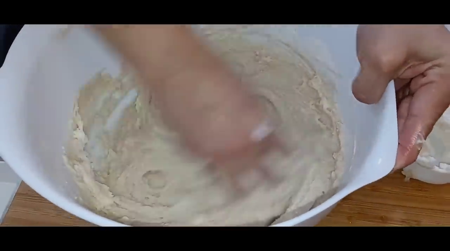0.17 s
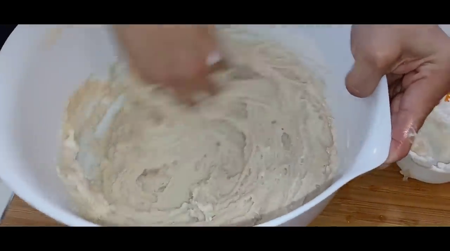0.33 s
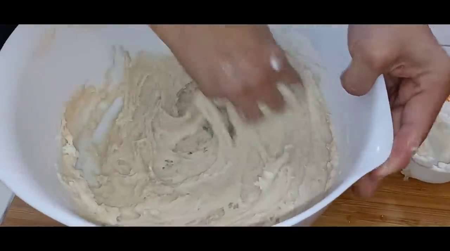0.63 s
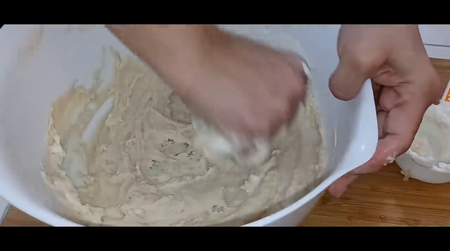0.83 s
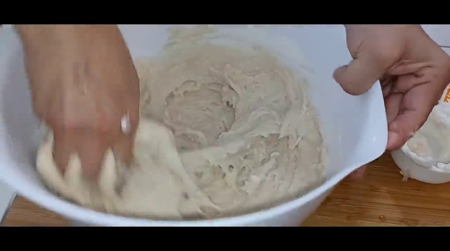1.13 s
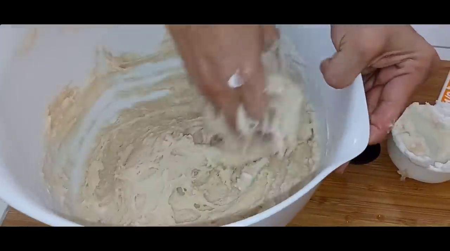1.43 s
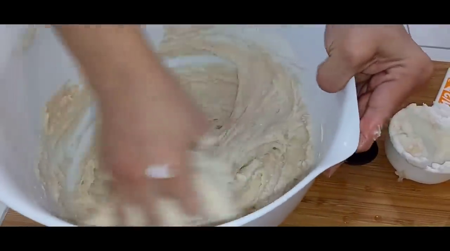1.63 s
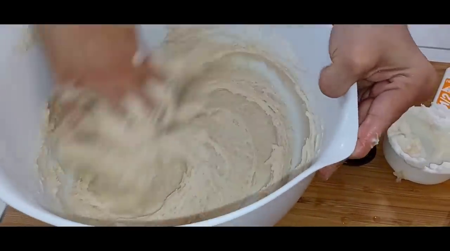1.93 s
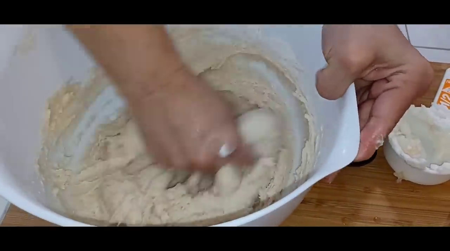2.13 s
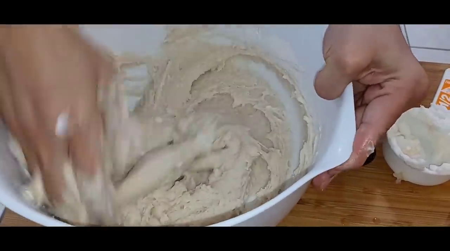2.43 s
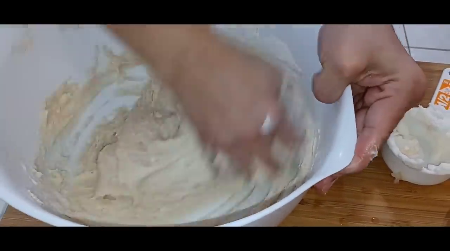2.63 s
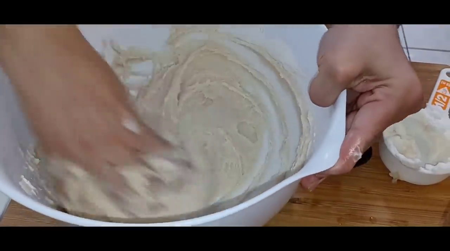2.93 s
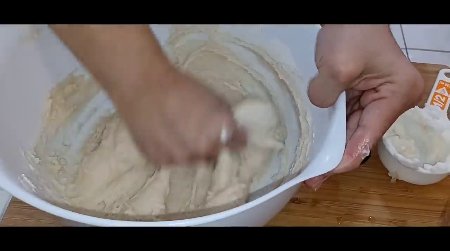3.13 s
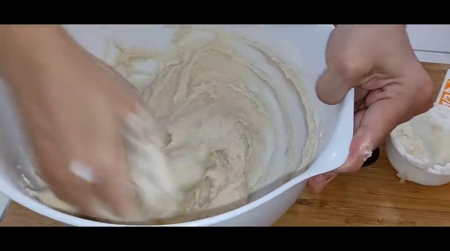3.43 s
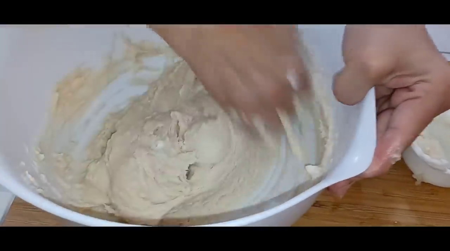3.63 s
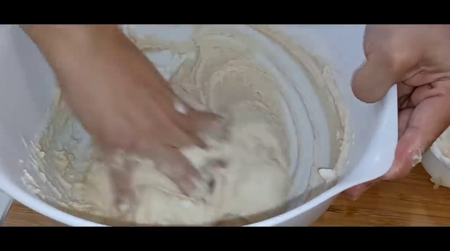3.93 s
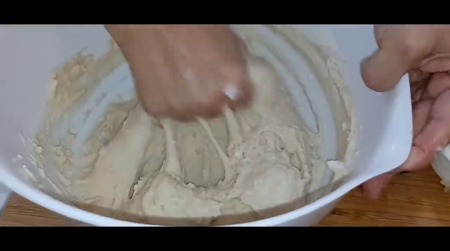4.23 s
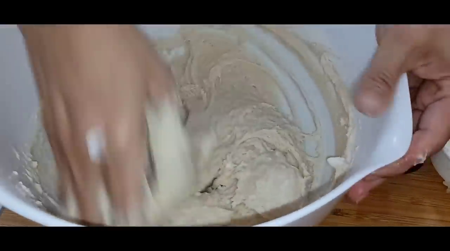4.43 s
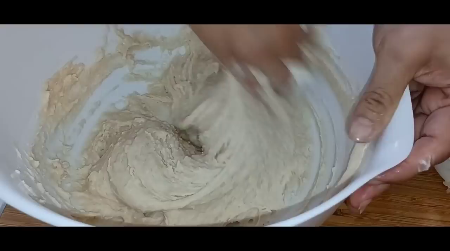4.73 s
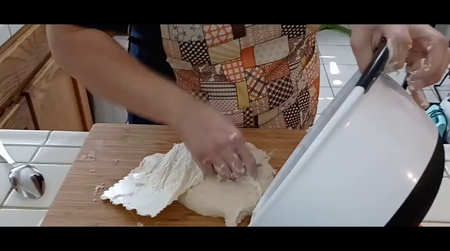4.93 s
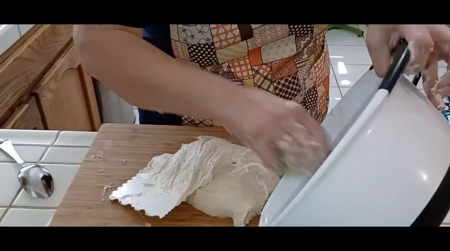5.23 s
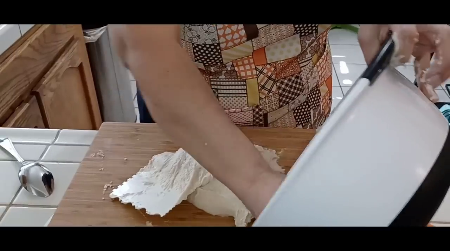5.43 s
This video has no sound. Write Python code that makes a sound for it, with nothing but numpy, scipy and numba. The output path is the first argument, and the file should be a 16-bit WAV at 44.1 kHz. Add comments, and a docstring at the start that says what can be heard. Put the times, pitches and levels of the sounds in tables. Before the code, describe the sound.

A hand kneads wet, sticky dough in a plastic bowl, with squelches, crackling peels, popping air pockets and a few hard bowl thumps.

```python
"""Kneading wet dough

A hand kneads wet, sticky dough in a large plastic bowl on a wooden board, heard close up in a kitchen.
Stick-slip friction peels dough off the plastic in a crackle of tiny slips, which rub, squelch, tear and fizz.
Trapped air squirts through closing gaps, and air pockets burst with a snap and a short, rising note.
A few times the bowl rocks and its impacts on the board excite thuds, wall modes and slaps of dough.
Each blow rings briefly in counter and room, over a low hum of filtered noise."""
import sys
import numpy as np
from scipy import signal
from scipy.fft import rfft, irfft
from scipy.io import wavfile
from numba import njit

SR = 44100
rng = np.random.default_rng(int(sys.argv[2]) if len(sys.argv) > 2 else 0)


def master(y):
    """Save y as 16-bit WAV."""
    cut = np.clip(np.atleast_2d(y).T, -1, 1)
    pcm = np.round(cut * 32767)  # scale
    wavfile.write(sys.argv[1], SR, pcm.astype(np.int16))


N = 245448
TIME = np.arange(N) / SR
# the strengths of kneading are zero between these times in seconds; its stirring does not return,
# and the reverberation of the dough is silent from the first time on
HUSH_S, RESUME_S = 5.351, 5.478


def kneading():
    """Stick-slip: slips rub the wall, squelch in the folds, snap strands and fizz in the wet film."""
    rub, squelch, tear, fizz = effort()
    # now and then a thicker strand lets go all at once
    strands = slips(per_s=200, spread_db=-1.0, clump_db=1.5, wide_hz=900)
    coarse = slips(per_s=6000, spread_db=3.5, clump_db=2.0, wide_hz=860) + undb(-8.0) * strands
    fine = slips(per_s=10000, spread_db=5.5, clump_db=1.26, wide_hz=1200) + undb(-9.0) * strands
    rubbing = undb(0.5) * rub * rubbed_wall(coarse)
    squelching = undb(-2.5) * squelch * folds(coarse, shift_db=3.5)
    tearing = undb(-2.5) * tear * torn_strands(fine, flicker_db=3.5)
    fizzing = undb(-3.5) * fizz * wet_film(fine, flicker_db=2.5)
    return rubbing + squelching + tearing + fizzing + squelch * bubbles(cycles=15.0)


# The hand drags the dough round and peels it off the wall.
# Each row: start, hardest moment and end in seconds, squelch in dB before mixing, rubbing and tearing
# in dB relative to the squelch, extra fizz in dB.
PULLS = [(-0.03, 0.001, 0.014, -45.5, -1.5, -10, 2.5), (0.367, 0.462, 0.46, -51, -5, -11, 0.5),
         (1.205, 1.288, 1.4, -46.5, -22, -7.5, 4), (1.724, 1.821, 1.84, -40.5, -5, -11.5, -2),
         (2.565, 2.653, 2.78, -44, -9, -12, 1), (3.532, 3.628, 3.73, -42.5, -8.5, -9.5, -0.5),
         (4.608, 4.818, 4.87, -48.5, -6, -8.5, -2), (4.995, 5.034, 5.24, -55, 4.5, -11.5, -8)]
# The fingers close in the dough.
# Each row: start in seconds, squelch in dB before mixing, rubbing and tearing in dB relative to the squelch,
# extra fizz in dB.
SQUEEZES = [(0.026, -54.5, 4, -9, 1), (0.485, -59, -24, -9, -14), (0.643, -56, 2, -14, -20),
            (0.7, -66, -4, -10, 3), (0.766, -58, -3, -13, 0), (0.847, -60, 2, -10, -9),
            (0.929, -54, 2, -19, -16), (1.02, -70.5, 18, 7, 0), (1.097, -59, 0, -5.5, 2),
            (1.187, -48.5, -7, -23, -14), (1.644, -54, -2, -5.5, 0), (2.075, -61.5, 2, -13, -12),
            (2.31, -65, 5, -5, 10), (2.386, -70, -15, 6, 16), (2.806, -51, -7, -2, 2.5),
            (3.009, -58, 2, -4.5, 4), (3.069, -67, 10, -13, -10), (3.122, -66.5, 2, 2, 1),
            (3.259, -79, 20.5, 10, 23), (3.358, -69, 4, 6.5, 15.5), (3.483, -61.5, 0, -11, -17),
            (3.534, -54.5, -29, -18, -5), (3.996, -59, 5.5, -1, -1), (4.032, -49.5, -2, -27, -14),
            (4.125, -57.5, 2.5, -10, -7), (4.249, -59.5, -29, -37, 4), (4.365, -70, -6, 7, 8),
            (4.425, -61.5, 1.5, -9, 1.5), (4.641, -50.5, 1, -6, 1), (4.915, -62.5, 2, -22, -3),
            (5.179, -65, 7, -3, 2), (5.299, -54.5, -1.5, -22, -4), (5.478, -67.5, 8, -17, -25)]
# The hand slows or turns and the stirring mostly dies down.
# Each row: centre in seconds, half length in seconds (to 1/e), change of level in dB.
LULLS = [(0.17, 0.028, -1.5), (0.528, 0.046, -24), (0.794, 0.041, -13), (0.94, 0.05, -8.5),
         (1.516, 0.06, -3.5), (2.52, 0.09, -8.5), (2.974, 0.023, -5), (3.294, 0.047, -16),
         (3.45, 0.06, -15), (3.952, 0.036, -12), (4.234, 0.075, -6.5), (4.487, 0.041, -22),
         (4.977, 0.16, -7), (5.256, 0.04, -18), (2.18, 0.088, 1)]
# a pull swells from SWELL dB below its hardest moment and eases off to EASE dB below it
PULL_ATTACK_S, PULL_SWELL_DB, PULL_EASE_DB, PULL_T60_S = 0.04, 13, 5.5, 0.43
# a squeeze is one short push
SQUEEZE_ATTACK_S, SQUEEZE_HOLD_S, SQUEEZE_T60_S = 0.0048, 0.022, 0.31
# before mixing, the film fizzes at FIZZ_DB when the squelch is at FIRM_DB, and grows more slowly than it
FIZZ_DB, FIRM_DB, FIZZ_GROWTH = -48, -44, 0.86
# quiet stirring between strokes, in dB before mixing: rubbing, squelch, tearing, fizz
STIR_DB = (-65, -69.5, -67.5, -57.5)
STIR_WAVER_DB = 2


def effort():
    """Power addition: the strengths of pulls, squeezes and quiet stirring combine as sums of squares."""
    strokes = []
    for start, hardest, end, db, *shares in PULLS:
        below_db = np.interp(TIME, [start, hardest, end], [PULL_SWELL_DB, 0, PULL_EASE_DB])
        pull = undb(db - below_db) * envelope(start, end, PULL_ATTACK_S, PULL_T60_S)
        strokes.append((pull, *shares))
    for s, db, *shares in SQUEEZES:
        squeeze = undb(db) * envelope(s, s + SQUEEZE_HOLD_S, SQUEEZE_ATTACK_S, SQUEEZE_T60_S)
        strokes.append((squeeze, *shares))
    lulls = sum(db * np.exp(-((TIME - s) / half_s) ** 2) for s, half_s, db in LULLS)
    stirring = np.array([undb(db + lulls + STIR_WAVER_DB * walk(per_s=25)) for db in STIR_DB])
    power = stirring ** 2 * (TIME < HUSH_S)
    for push, rub_db, tear_db, fizz_db in strokes:
        fizz = undb(FIZZ_DB + fizz_db) * (push / undb(FIRM_DB)) ** FIZZ_GROWTH
        power += np.array([undb(rub_db) * push, push, undb(tear_db) * push, fizz]) ** 2
    return np.sqrt(power) * ((TIME < HUSH_S) | (TIME > RESUME_S))


def slips(per_s, spread_db, clump_db, wide_hz):
    """Stick-slip releases as random impulses: uneven in size, in clumps, each from its own place in the bowl."""
    happens = rng.random(N) < per_s / SR
    uneven_db = spread_db * np.minimum(rng.exponential(size=N), np.pi)
    size = undb(uneven_db + clump_db * walk(per_s=130))
    mid, side = happens * size * rng.standard_normal((2, N))
    return unit(widen(mid, side, wide_hz))


# Colour of dough rubbing the wall. Each row: frequency in Hz, relative level in dB.
RUB = [(120, 6.5), (300, 2), (470, 0.5), (570, 1.5), (750, -9), (1000, -12), (1600, -78)]


def rubbed_wall(coarse):
    """Spectral filtering: coarse slips take on the low colour of rubbing."""
    return unit(colour(coarse, RUB))


# Folds of dough that ring as it peels.
# Each row: central note in Hz, width in Hz (doubled in each of two resonators in series), relative level in dB.
FOLDS = [(1050, 176, 9), (1420, 630, 1), (1797, 770, 5), (2097, 140, 3), (2816, 295, -1), (3250, 660, -14)]
# the folds change size as they are worked, and the slips come in gulps
FOLD_DRIFT_OCT, GULP_DB = 0.11, 1.5


def folds(x, shift_db):
    """Cavity resonance: each fold rings more or less, higher or lower, as the fingers open and close it."""
    out = 0
    for hz, width, db in FOLDS:
        note = hz * 2 ** (FOLD_DRIFT_OCT * walk(per_s=14))
        level = undb(db + shift_db * walk(per_s=16))
        gulps = x * undb(GULP_DB * walk(per_s=100))
        out = out + level * cavity(gulps, note, 2 * width / hz)
    return unit(out)


# Colour of tearing strands. Each row: frequency in Hz, relative level in dB.
TEAR = [(2000, 2), (3300, -1), (4000, -6.5), (4900, 9), (6500, 8), (8000, -13.5), (11000, -44.5)]


def torn_strands(fine, flicker_db):
    """Spectral filtering: fine slips take on the colour of tearing, whose level flickers on its own."""
    return undb(flicker_db * walk(per_s=45)) * unit(colour(fine, TEAR))


# Colour of the fizzing film and of bursting skins. Each row: frequency in Hz, relative level in dB.
FIZZ = [(5000, -15.5), (8200, -10), (10500, -0.5), (13300, 4), (14500, 2), (16000, -5)]


def wet_film(fine, flicker_db):
    """Spectral filtering: fine slips take on the treble of the wet film, whose level flickers on its own."""
    return undb(flicker_db * walk(per_s=52)) * unit(colour(fine, FIZZ))


# tiny air bubbles: rate, pitch range, level relative to the squelch (7.5 dB below to 2.5 dB above BUBBLE_DB)
BUBBLES_PER_S, BUBBLE_LOW_HZ, BUBBLE_HIGH_HZ, BUBBLE_DB, BUBBLE_SPREAD_DB = 100, 893, 4200, 7, 5


def bubbles(cycles):
    """Bubble resonance: bursts at random times ring for a few cycles, each with its own pitch, size and place."""
    out, t = np.zeros((2, N)), TIME[:SR // 40]
    s = 0
    for wait, pitch, size, place in rng.random((N // 300, 4)):
        s -= np.log(1 - wait) / BUBBLES_PER_S  # exponential waiting time
        if s < TIME[-1]:
            hz = BUBBLE_LOW_HZ * (BUBBLE_HIGH_HZ / BUBBLE_LOW_HZ) ** pitch
            gain = undb(BUBBLE_DB + BUBBLE_SPREAD_DB * (2 * size - 1.5))
            note = gain * np.sin(2 * np.pi * hz * t) * fade(t, cycles / hz)
            add(out, s, np.outer(np.sqrt([place, 1 - place]), note))
    return out


# Air and wet dough squirting through a narrow gap.
# Each row: start in seconds, length in seconds, central gap note in Hz, level in dB before mixing,
# left minus right in dB.
SQUIRTS = [(0.148, 0.07, 1510, -64.5, -3), (0.346, 0.11, 1630, -59.5, 8), (0.424, 0.026, 6440, -56, 3),
           (0.425, 0.021, 2870, -68, -3), (0.538, 0.021, 3740, -65, 0), (1.055, 0.016, 6200, -55, 1),
           (1.257, 0.025, 4650, -52, -4), (1.293, 0.027, 2770, -49, -3), (1.303, 0.032, 4360, -51, -4),
           (1.403, 0.024, 3790, -56, -1), (1.486, 0.22, 2880, -72, -6), (1.896, 0.05, 1480, -54, -3),
           (2.31, 0.089, 1650, -64, 6), (2.392, 0.053, 3200, -59.5, -2), (2.558, 0.077, 1570, -58, 7),
           (2.581, 0.073, 2900, -52, -3), (2.681, 0.064, 4530, -48, -3), (2.787, 0.04, 4730, -58, 8),
           (3.117, 0.052, 4300, -58.5, -4), (3.263, 0.029, 7000, -54.5, 5), (3.37, 0.045, 2880, -61, 1),
           (3.555, 0.063, 1980, -48, 7), (3.613, 0.047, 2750, -51, 13), (3.636, 0.066, 4800, -52, 1),
           (3.688, 0.027, 4900, -56, 2), (3.75, 0.047, 5240, -58, 9), (4.016, 0.03, 2700, -53, 9),
           (4.053, 0.034, 2180, -56, 8), (4.148, 0.021, 3080, -54.5, 6), (4.238, 0.071, 1470, -59, 2),
           (4.528, 0.12, 1780, -60, -3), (4.639, 0.014, 6300, -48.5, 2), (5.313, 0.03, 2360, -68, 8),
           (5.466, 0.092, 1764, -65.5, -2)]
# resonator width and total rise as shares of the note; the gap is widest at this share of the length
SQUIRT_WIDTH, SQUIRT_RISE, SQUIRT_OPEN = 0.32, 0.08, 0.27


def squirts():
    """Gap resonance: a sputter of slips rings a gap that opens quickly, and its note rises as it closes."""
    out = np.zeros((2, N))
    sputter = slips(per_s=3500, spread_db=2.5, clump_db=3.5, wide_hz=2500)
    for s, length_s, hz, db, pan_db in SQUIRTS:
        u = np.arange(int(length_s * SR)) / (length_s * SR)
        source = sputter.take(int(s * SR) + np.arange(len(u)), axis=1, mode="wrap")
        opening = np.interp(u, [0, SQUIRT_OPEN, 1], [0, 1, 0])
        note = hz * (1 + SQUIRT_RISE * (u - .5))
        sound = unit(opening * cavity(source, note, SQUIRT_WIDTH))
        add(out, s, undb(db) * panned(pan_db) * sound)
    return out


# Air pockets bursting.
# Each row: time in seconds, snap in dB before filtering and mixing, cavity note in Hz at the start,
# cavity level in dB before mixing, left minus right in dB.
POPS = [(0.0389, -49, 1000, -37.5, -9), (0.038, -38, 5900, -26, 5.5), (0.039, -50, 2680, -36, 0),
        (0.4518, -21.5, 5980, -22, 2.5), (0.455, -48, 1890, -38, 7), (0.5802, -37, 6580, -38.5, 1),
        (0.643, -40, 6200, -49, 5), (0.6494, -32, 2320, -31, 3), (0.7378, -37, 6100, -45, 0),
        (0.837, -35, 6000, -65, 6), (0.8525, -23, 6030, -23, -1.5), (0.853, -38, 700, -38, 5),
        (1.059, -35, 1050, -40, -2), (1.103, -53, 2800, -38, -5.5), (1.1937, -36, 3040, -30, -3),
        (1.1968, -32.5, 4500, -31, -6), (1.243, -41, 2670, -25.5, -3), (1.2626, -43, 4760, -38, 2),
        (1.3654, -33, 5260, -35, 2), (1.2782, -31.5, 3200, -23, 0), (1.7739, -53, 1750, -30, 12),
        (1.8184, -46, 4630, -14.5, -6.5), (1.82, -58, 1800, -31, 12), (2.2397, -36, 14000, -22, 1),
        (2.299, -41, 11000, -41, 5), (2.41, -42, 2900, -55, 0), (2.3589, -42, 6000, -45, 2),
        (2.392, -35, 5970, -60, -5), (2.4399, -38, 6000, -49, 2), (2.6214, -34, 2110, -30, 7),
        (2.652, -28.5, 2760, -20, 2), (2.661, -32, 2390, -29, -5), (2.678, -29, 2500, -24, 2.5),
        (2.6858, -43, 2500, -26, 12), (2.75, -51, 1900, -36, 7), (2.8948, -37, 5500, -45, 2),
        (3.174, -70, 1370, -48, 2), (3.262, -35.5, 7300, -56, 1), (3.277, -37, 6240, -54, 13),
        (3.484, -44, 1410, -42.5, -3), (3.602, -43, 2000, -32, 3), (3.6232, -37, 1930, -24.5, -3),
        (3.627, -24.5, 1050, -23, 5), (3.634, -40, 1700, -31, 4), (4.086, -46, 6450, -28.5, 2),
        (4.1512, -37.5, 3200, -48, -2), (4.156, -52, 1080, -52, -5), (4.359, -26.5, 12000, -58, 3),
        (4.5432, -39.5, 2500, -43, -3), (4.645, -31, 4640, -38, 1), (4.7684, -28, 2800, -32, 6),
        (4.7922, -22.5, 3230, -33, 6.5), (4.804, -28, 5000, -30, 4), (4.954, -39, 5940, -61, 5),
        (5.1, -48, 1090, -41.5, 15.5), (5.1820, -28, 2430, -36.5, 2), (5.1944, -28, 6000, -35, -7)]


def pops(cycles, snap_t60, spray_db, skin_db, open_s, rise):
    """Cavity burst: a film snaps with a little spray; the pocket behind rings for a few cycles, rising."""
    snaps, pockets, t = np.zeros((2, N)), np.zeros((2, N)), TIME[:SR // 20]
    for s, snap_db, hz, pocket_db, pan_db in POPS:
        place = panned(pan_db)
        spray, skin = rng.standard_normal((2, 2, len(t)))
        snap = (t == 0) + undb(spray_db) * spray * fade(t, snap_t60)
        add(snaps, s, place * undb(snap_db) * snap)
        # the slack skin of the pocket smears its note
        skin = unit(signal.lfilter(*signal.iirpeak(hz, 1.5, fs=SR), skin))
        rising = 1 + rise * np.minimum(t * hz / cycles, 1)
        note = np.sin(2 * np.pi * hz * t * rising) + undb(skin_db) * skin
        note = note * (1 - np.exp(-t / open_s)) * fade(t, cycles / hz)
        add(pockets, s, place * undb(pocket_db) * note)
    return undb(6.0) * colour(snaps, FIZZ) + undb(-2.0) * pockets


def scatter(x, t60, gap_s, per_s, count):
    """Multipath reflection: paths inside the bowl keep changing as the hand moves, at constant total power."""
    shares = np.array([walk(per_s=per_s) for _ in range(count)])
    shares /= np.sqrt(np.sum(shares ** 2, axis=0))
    return sum(reflections(share * x, t60=t60, gap_s=gap_s, wide_hz=700) for share in shares)


# Dough slapping the wall as the bowl lands. Each row: frequency in Hz, relative level in dB.
SLAP = [(150, -13.5), (300, -1), (520, 8), (800, -7), (1200, -0.5), (2300, -3.5), (3200, -6.5),
        (5000, -26.5), (9000, -42)]
# The bowl landing and bouncing on the board.
# Each row: time in seconds, thud in dB, thud note in Hz, clack in dB before mixing, favoured wall note in Hz,
# contact time in ms (twice the time to peak force), slap in dB relative to the clack,
# ratio by which the load of dough shifts the wall notes, cycles of thud until 60 dB down.
KNOCKS = [(0.8868, -7, 193.0, -8.5, 1544, 0.25, -7, 0.86, 7.0),
          (0.8907, -5.5, 135.0, -13.5, 517, 0.29, -17, 0.93, 4.1),
          (0.9171, -25, 230.0, -21, 570, 0.58, -12, 0.95, 6.4),
          (0.9401, -24, 158.0, -18, 529.0, 0.76, -19.3, 0.92, 7.7),
          (0.9581, -30, 144.0, -21, 583, 1.4, -17.5, 1.03, 5.3),
          (1.371, -28.6, 164.0, -27.5, 1188.0, 0.17, -10, 1.003, 5.4),
          (1.3742, -16, 176.0, -38, 610.0, 0.37, -16, 0.84, 7.3),
          (1.3815, -17.8, 248.0, -25.5, 1065, 0.2, -14, 0.95, 6.6),
          (1.3904, -17.5, 132.0, -30, 1049.0, 0.25, -17, 1.04, 7.8),
          (1.4117, -25, 181.0, -36, 946.0, 0.45, -11.5, 1.04, 4.2),
          (1.697, -4.5, 243.0, -11.5, 1270, 0.12, -15.5, 0.93, 8.7),
          (1.7005, -3, 169.0, -16, 499.0, 0.52, -23, 1.13, 7.9),
          (1.7152, -30, 255.0, -20.5, 510.0, 1.1, -20, 0.96, 5.6),
          (1.755, -27, 266.0, -29, 287.0, 0.78, -20, 1, 4.5),
          (4.485, -12, 313.0, -17, 900, 0.3, -19, 0.97, 7.7),
          (4.4924, -10.7, 141.0, -22.5, 514, 0.4, -17, 1.17, 3.5),
          (4.5172, -12.5, 129.0, -34.6, 784.0, 0.41, -16, 1.1, 4.4),
          (4.517, -17, 231.0, -33.0, 464.0, 0.37, -13, 0.88, 6.7)]
# Soft pushes of the palm. Each row: time in seconds, level in dB, note in Hz.
PRESSES = [(0.031, -39, 191), (0.646, -38.5, 141), (0.706, -45, 123), (3.019, -39, 125), (3.739, -33, 166),
           (4.258, -40.5, 116), (4.318, -38.5, 114), (5.176, -35, 187), (5.481, -27.5, 285),
           (5.502, -32, 218), (5.527, -39, 135.4), (5.545, -37.5, 160)]


def knocks():
    """Impact: the landing bowl thuds, its wall clacks and dough slaps, duller the longer the contact."""
    thuds, clacks = np.zeros((2, 1, N))
    slaps, t = np.zeros((2, N)), TIME[:SR // 5]
    spatter = unit(colour(slips(per_s=5100, spread_db=2.5, clump_db=3.0, wide_hz=800), SLAP))
    for s, thud_db, hz, clack_db, wall_hz, contact_ms, slap_db, stretch, cycles in KNOCKS:
        add(thuds, s, undb(thud_db) * thud(hz, cycles=cycles, rise_s=0.0027))
        push = t * np.exp(-t / (contact_ms / 2000))
        push = undb(clack_db) * push / push.sum()
        add(clacks, s, -undb(-1.5) * convolve(push, wall(wall_hz, stretch)))
        slap = np.roll(spatter, -int(s * SR), axis=1)[:, :len(t)] * fade(t, t60=0.1)
        add(slaps, s, undb(slap_db) * convolve(slap, push))
    for s, db, hz in PRESSES:
        add(thuds, s, undb(db) * thud(hz, cycles=12.2, rise_s=0.0028))
    # the thin wall radiates little bass
    clacks = butter(clacks, 2, 260, "high")
    return thuds + clacks + slaps + after_ring(thuds + clacks, clacks)


def thud(hz, cycles, rise_s):
    """Mass on a spring: bowl and dough bounce on a springy base as a damped sine."""
    t = TIME[:SR // 2]
    return -ring([(hz, 0, cycles / hz)]) * (1 - np.exp(-t / rise_s))


# Modes of the bowl, damped by the dough.
# Each row: frequency in Hz before the load shifts it, relative level in dB, 60 dB decay time in seconds.
BOWL = [(252.5, 8.5, 0.057), (345, -5.5, 0.052), (468, 1, 0.021), (564, -5, 0.03), (602, 7.5, 0.026),
        (773, -2, 0.021), (885, -2.5, 0.023), (1028, -1.5, 0.02), (1130, -5, 0.025), (1430, 2.5, 0.0063),
        (1760, 2.5, 0.0094), (2240, 5.5, 0.0062), (2830, 1.5, 0.0076), (3350, -5, 0.0055)]
# the modes of the wall near the favoured note answer this much more, within octaves
FAVOUR_DB, FAVOUR_OCT = 12, 0.2


def wall(favoured_hz, stretch):
    """Modal vibration: neighbours swing in opposite senses; the blow's place favours some, the load shifts all."""
    out = 0
    for k, (hz, db, t60) in enumerate(BOWL):
        octaves = np.log2(hz / favoured_hz)
        favour_db = FAVOUR_DB * np.exp(-(octaves / FAVOUR_OCT) ** 2)
        out = out + (-1) ** k * ring([(hz * stretch, db - 8.0 + favour_db, t60)])
    return out


# Modes of counter and room, which boom on after a blow.
# Each row: frequency in Hz, relative level in dB, 60 dB decay time in seconds.
BOOM = [(66.1, -6, 0.54), (76.9, -9, 0.73), (98.6, 2, 0.38), (114.0, 0.5, 0.28), (135, 7.3, 0.13),
        (161.2, -11, 0.39), (210.8, 2, 0.27), (248.1, -4, 0.22), (284, -5.5, 0.092), (333.4, -8, 0.41),
        (458, -1.3, 0.28), (510, -6.5, 0.28), (553, -6.4, 0.31), (692, -9, 0.2)]


def after_ring(body, clacks):
    """Modal and diffuse response: low modes boom on, and the counter top scatters the clack straight back."""
    boom = undb(-55.5) * convolve(body, ring(BOOM))
    return boom + undb(-8.0) * reflections(clacks, t60=0.082, gap_s=0.0006, wide_hz=887)


# Early echoes of the blows from cupboard and ceiling. Each row: delay in seconds, level in dB.
ECHOES = [(.031, -19), (.066, -18)]


def echoes(blows):
    """Specular reflection: dulled copies of the blows return after a delay."""
    dull = butter(blows, 2, 700, "low")
    return sum(undb(db) * delay(dull, s) for s, db in ECHOES)


# Spectrum of the kitchen background. Each row: frequency in Hz, relative level in dB per Hz.
HUM = [(20, -81), (45, -52), (70, -10.5), (130, 3.5), (170, -1.5), (220, 5.5), (280, -9.5), (450, -17.5),
       (700, -23), (1500, -33.5), (4000, -50), (16000, -44)]


def hum(db):
    """Filtered noise: a steady low hum, alike at both ears in the bass."""
    return undb(db) * unit(colour(stereo_noise(N, wide_hz=686), HUM))


def undb(db):
    """Logarithmic level: decibels to amplitude gain."""
    return 10 ** (np.asarray(db) / 20)


def unit(x):
    """Normalization: scale to an rms of 1."""
    return x / np.sqrt(np.mean(x ** 2))


def panned(db):
    """Level difference: gains of left and right that differ by db."""
    return undb(np.array([[db], [-db]]) / 2)


def add(track, s, sound):
    """Superposition: mix a sound into a track from time s on."""
    i = int(s * SR)
    track[..., i:i + sound.shape[-1]] += sound[..., :N - i]


def delay(x, s):
    """Propagation delay: the same sound, s seconds later."""
    return np.pad(x, ((0, 0), (int(s * SR), 0)))[:, :N]


def butter(x, order, hz, kind):
    """Maximally flat filtering above or below a cutoff."""
    return signal.sosfilt(signal.butter(order, hz, kind, fs=SR, output="sos"), x)


def convolve(x, response):
    """Linear response: pass a sound through an impulse response."""
    return signal.fftconvolve(np.atleast_2d(x), np.atleast_2d(response), axes=-1)[:, :N]


def colour(x, points):
    """Minimum-phase filtering: the folded cepstrum makes a (Hz, dB) outline causal."""
    hz, db = np.transpose(points)
    f = np.fft.rfftfreq(4096, 1 / SR) + 1  # 1 Hz up, to avoid log(0)
    cepstrum = irfft(np.log(undb(np.interp(np.log(f), np.log(hz), db))))
    cepstrum[1:len(f) - 1] *= 2
    cepstrum[len(f):] = 0
    return convolve(x, irfft(np.exp(rfft(cepstrum))))


def fade(t, t60):
    """Exponential decay by 60 dB in t60 seconds."""
    return np.exp(-np.log(1000) * t / t60)


def envelope(start, end, attack_s, t60):
    """Attack and decay: rise from start, hold until end, then die away."""
    return np.clip((TIME - start) / attack_s, 0, 1) * fade(np.maximum(TIME - end, 0), t60)


def walk(per_s):
    """Slow random modulation: normal random levels joined by straight lines."""
    levels = rng.standard_normal(N // 100)
    return np.interp(TIME * per_s, np.arange(len(levels)), levels)


def ring(modes):
    """Modal decay: half a second of damped sines."""
    t = TIME[:SR // 2]
    return sum(undb(db) * np.sin(2 * np.pi * hz * t) * fade(t, t60) for hz, db, t60 in modes)


@njit
def resonate(x, hz, width):
    """State-variable resonance whose note moves; width is a share of the note."""
    out = np.empty_like(x)
    for c in range(len(x)):
        band, low = 0., 0.
        for i in range(x.shape[1]):
            g = np.tan(np.pi * min(hz[i] / SR, .45))
            v = (band + g * (x[c, i] - low)) / (1 + g * (g + width))
            band, low, out[c, i] = 2 * v - band, low + 2 * g * v, width * v
    return out


def cavity(x, hz, width):
    """Resonators in series: a moving resonance with steep sides."""
    return resonate(resonate(x, hz, width), hz, width)


def widen(mid, side, wide_hz):
    """Interaural coherence: both ears are alike well below wide_hz and differ above."""
    side = butter(side, 1, wide_hz, "high")
    return np.array([mid + side, mid - side])


def stereo_noise(size, wide_hz):
    """Partly coherent noise: alike at both ears below wide_hz and unrelated above."""
    mid, side = rng.standard_normal((2, size))
    return widen(mid, side, wide_hz)


def reflections(x, t60, gap_s, wide_hz):
    """Diffuse reverberation: a decaying noise tail of unit energy that builds up over gap_s."""
    t = TIME[:SR // 2]
    tail = stereo_noise(len(t), wide_hz) * fade(t, t60) * (1 - np.exp(-(t / gap_s) ** 2))
    return convolve(x, tail / np.sqrt(np.sum(tail ** 2) / 2))


def scene():
    """Superposition: dough sounds scatter inside the bowl, and dough and blows reverberate over a hum."""
    bursts = undb(2.0) * pops(cycles=11.9, snap_t60=0.0066, spray_db=-12.5, skin_db=-6.0,
                              open_s=0.00017, rise=0.028)
    worked = kneading() + undb(-6.5) * squirts()
    # pockets burst on top of the dough, in the open, and scatter less
    scattered = scatter(worked + undb(-1.5) * bursts, t60=0.033, gap_s=0.0012, per_s=12, count=5)
    dough = worked + bursts + undb(-3.5) * scattered
    # the reverberation of the dough is gated to silence from HUSH_S on
    gate = TIME < HUSH_S
    dough_reverb = gate * reflections(dough, t60=0.36, gap_s=0.022, wide_hz=606)
    dough = dough + undb(-13.5) * dough_reverb
    blows = knocks()
    # only above its lowest modes is the room diffuse
    bright = butter(blows, 2, 280, "high")
    blow_reverb = reflections(bright, t60=0.34, gap_s=0.017, wide_hz=400)
    blows = blows + echoes(blows) + undb(-13.0) * blow_reverb
    return dough + blows + hum(db=-53.5)


# The two microphone ports hear different colours. Each row: frequency in Hz, left minus right in dB.
PORTS = [(120, 0), (450, 1), (750, 1.5), (1150, 3), (1800, 1.5), (2700, -9.5), (4300, 2), (8000, 3),
         (13000, 1.5)]
PORT_LAG_S, TOP_HZ = 0.00018, 15700


def record(dry):
    """Two-port reception: the left port hears first, each has its own colour; deepest bass and top are cut."""
    left = colour(dry[0], [(hz, db / 2) for hz, db in PORTS])
    right = delay(colour(dry[1], [(hz, -db / 2) for hz, db in PORTS]), PORT_LAG_S)
    both = butter(np.vstack([left, right]), 5, 57, "high")
    return signal.sosfilt(signal.ellip(8, .2, 70, TOP_HZ, fs=SR, output="sos"), both)


dry = scene()
out = record(dry)
master(out)
```